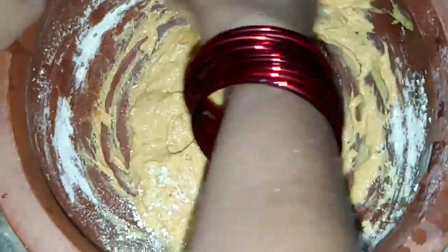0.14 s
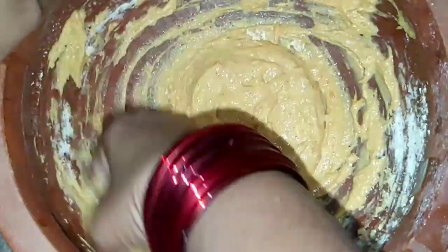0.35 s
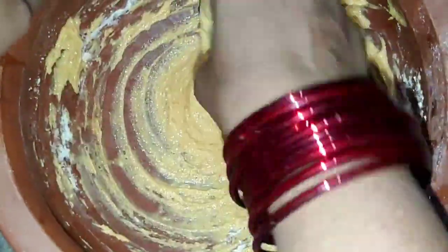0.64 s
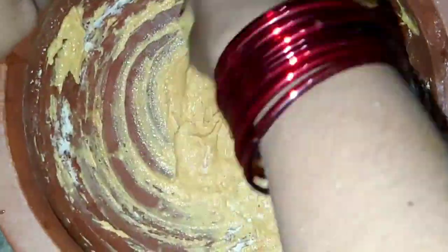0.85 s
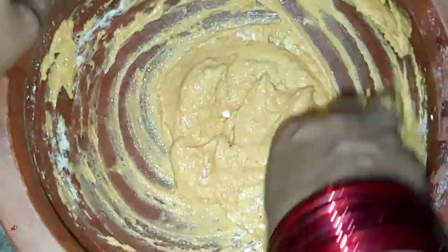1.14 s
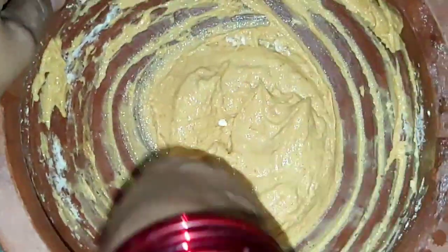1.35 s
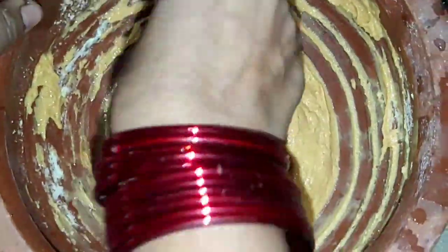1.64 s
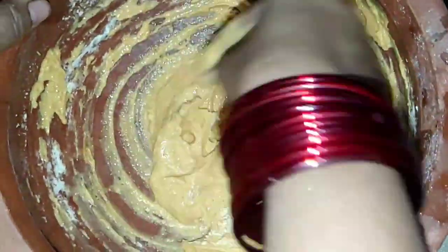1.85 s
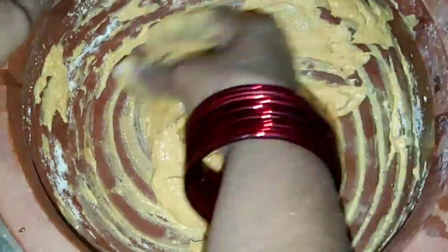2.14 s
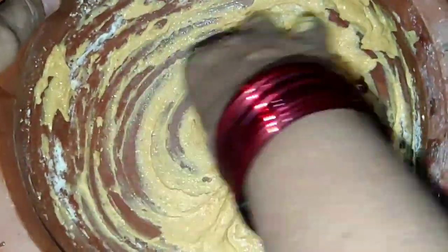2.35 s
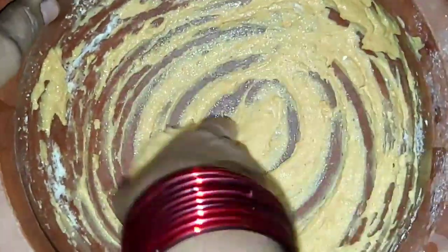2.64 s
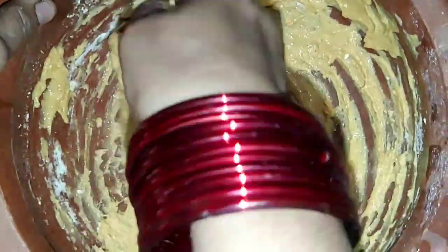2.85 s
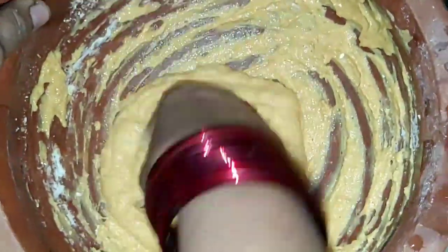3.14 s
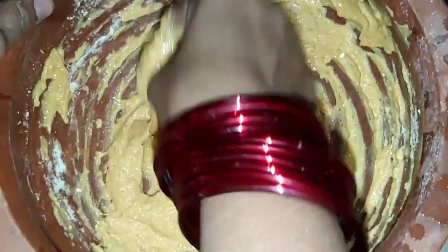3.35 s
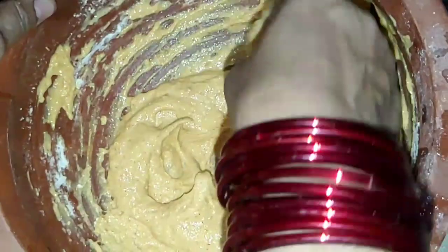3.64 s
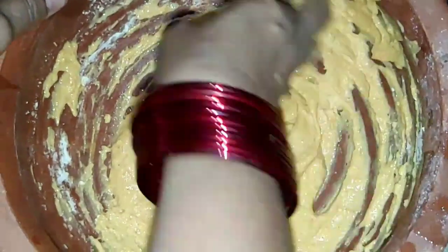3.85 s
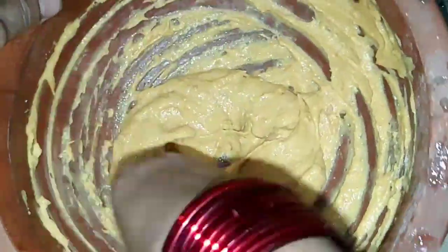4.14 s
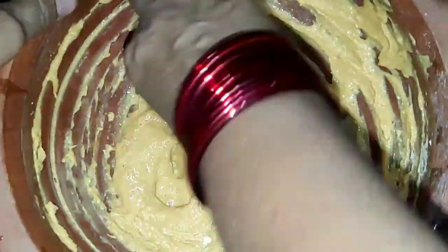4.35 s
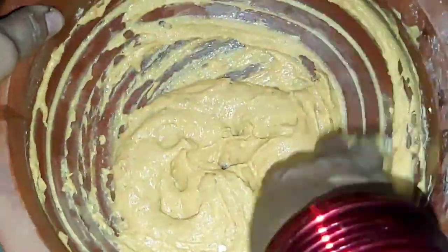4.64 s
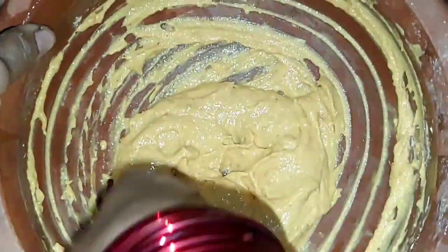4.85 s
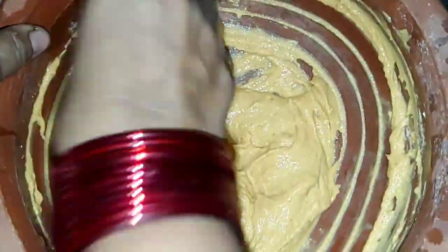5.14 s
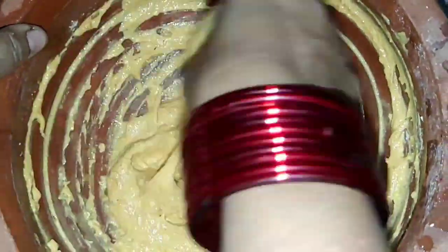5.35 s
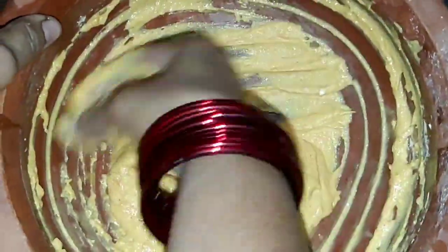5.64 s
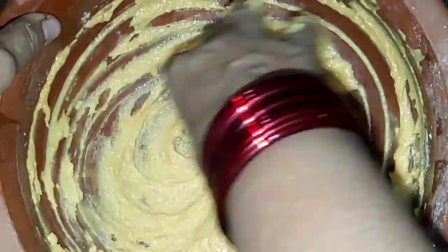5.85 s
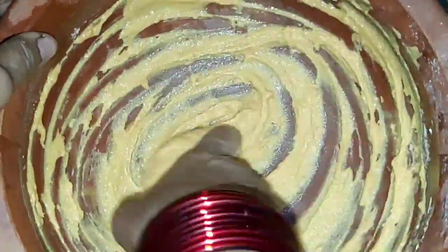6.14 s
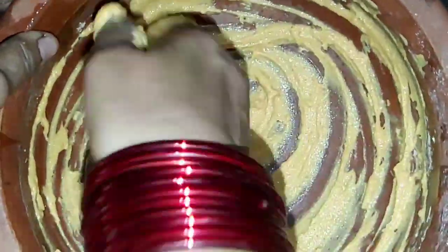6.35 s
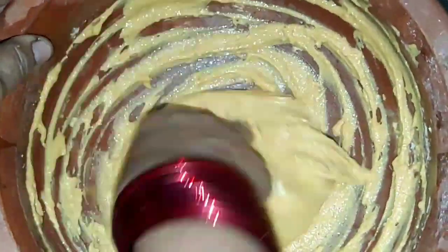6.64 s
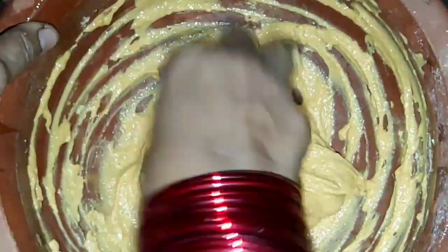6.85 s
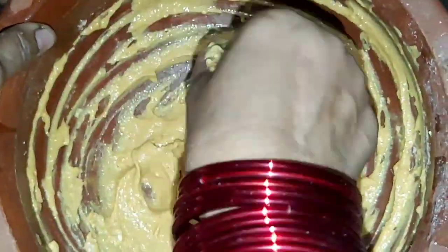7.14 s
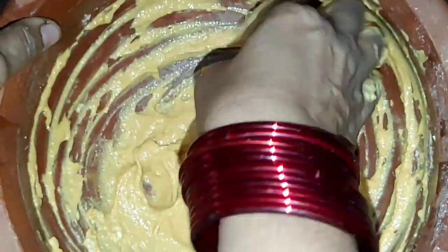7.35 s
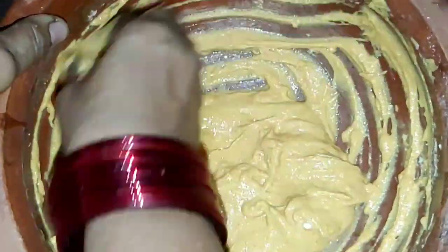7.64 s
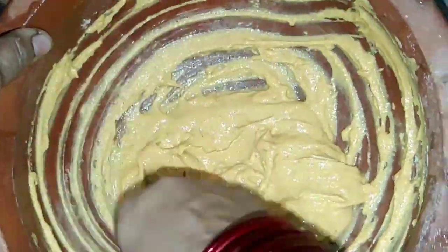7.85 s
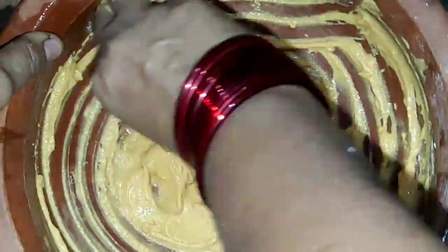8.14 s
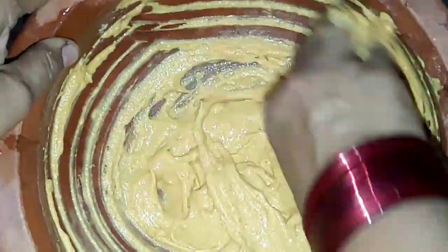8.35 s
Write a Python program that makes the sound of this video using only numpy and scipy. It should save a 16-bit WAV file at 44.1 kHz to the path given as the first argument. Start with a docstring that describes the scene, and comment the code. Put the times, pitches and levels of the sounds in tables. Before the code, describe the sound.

Close stereo sound of a hand beating thick batter in a clay pot, with short diffuse echo. A steady, thin high insect chirr, slightly left, and low humming rumble run throughout. Bangles knock and jingle at 0.05-0.25 s, then quiet wet smearing follows, with light jingles around 0.8-1.1. A clack at 1.27; a strong thump and bright jingle at 1.8, more tinkling at 2.1. Soft sticky sweeps lead to a dense clatter at 3.2-3.3 and a firm hollow knock at 3.5. Lighter jingles continue to 4.5, then a rattling cluster with a short gritty scrape at 4.65. A solid knock lands at 5.29, followed by squelchy sweeps to 6.5. The sharpest, loudest knock hits at 6.73, with clinks at 7.0 and 7.3. Batter smears from 7.5, a small scrape and jingle come at 7.93, light knocks near 8.1, and a last wet sweep swells to the end.

```python
"""Glass bangles on a wrist knock, jingle and scrape on a clay pot as the hand beats thick batter in it.
Knocks and thumps are damped noise bursts that wake pot modes; jingles are runs of glass modes and ticks.
Batter is random grains through air-pocket and palm resonances, swelling with each sweep of the hand.
A short diffuse echo surrounds the work; behind it, narrow noise bands chirr as insects over rumble and hum."""
import sys
import numpy as np
from scipy import signal
from scipy.fft import rfft, irfft, next_fast_len
from scipy.io import wavfile
from scipy.ndimage import uniform_filter1d, map_coordinates

SR = 44100
rng = np.random.default_rng(int(sys.argv[2]) if len(sys.argv) > 2 else 0)


def dump_mix(stems):
    """Bounce the given channels to the path in sys.argv[1] as a 16-bit WAV at rate SR."""
    frames = np.atleast_2d(stems).T  # one column per channel
    limited = np.clip(frames, -1, 1)  # hard clip at full scale
    pcm = np.round(limited * 32767).astype(np.int16)
    wavfile.write(sys.argv[1], SR, pcm)


N = 373968
TIME_S = np.arange(N) / SR
RING_SIZE = 8192  # samples in one short sound
PALM_HZ, PALM_WIDTH_HZ = 1080, 73  # hollow between palm and wall

# bangles striking the pot: start_s, level_db, contact_hz, left_minus_right_db, pot_ring_db
KNOCKS = [(.045, -26.5, 1440, 7, -3), (0.298, -33, 2630, 5, -20), (.896, -41, 2080, 8, -15),
          (1.268, -28, 2570, -6, 10), (1.281, -35, 2470, 4, 16), (1.8225, -24.5, 1410, 16.5, -19),
          (1.8251, -25, 2060, 13.5, -29), (2.003, -45, 800, 0, -12), (3.2015, -32, 1070, 14, -19),
          (3.2018, -33.5, 2150, 6, -18), (3.2245, -24.5, 2660, -5, 3), (3.227, -43, 1140, 0, -11),
          (3.244, -32, 5000, -6, -1), (3.258, -38.5, 2390, 3, -8), (3.28, -40, 4700, -2, -5),
          (3.313, -37, 6560, 2, -12), (3.236, -35, 2200, 8, -4), (3.496, -19, 1700, 7, -0.5),
          (3.503, -27, 2080, -2, -9), (3.506, -24.5, 1070, 6, -10), (4.072, -36.5, 1180, -8, -25),
          (4.447, -37, 2400, 3, -4), (4.653, -23, 2900, -3, 6), (4.671, -24, 2920, -15, 17),
          (4.68, -22, 2600, -11, 13), (4.677, -29, 5670, -3, 10), (4.6846, -27, 4400, -1, 4),
          (4.709, -27, 2750, -7, 7), (4.718, -25, 2930, -6, -1), (4.736, -32, 2550, 3, -4),
          (5.2878, -20, 2360, 1.5, -12), (6.729, -12, 1930, 4, -7), (6.7315, -29.5, 1040, 1, -8),
          (6.736, -28, 1750, 9, -13), (6.979, -28, 2000, 0, 4), (7.002, -49, 1540, -3, 3),
          (7.302, -34.5, 2270, 6.5, 0), (7.928, -30.5, 3150, -6, 4), (7.954, -28, 3650, -3, 0),
          (8.048, -34.5, 2220, 0, 1), (8.11, -28.5, 2150, 2.5, -5)]
# wrist thumping the wall: start_s, level_db, thud_hz, thud_width_hz, pot_ring_db
THUMPS = [(1.825, -15, 570, 395, -9.5), (3.201, -28.5, 645, 330, -16), (3.505, -18.5, 550, 260, -7),
          (4.071, -33, 574, 280, -15), (5.2852, -23.5, 690, 95, -14), (6.73, -27, 520, 190, -13),
          (6.995, -36, 690, 380, -10)]
# soft pushes rocking the pot: start_s, level_db, pitch_hz
NUDGES = [(1.276, -37.5, 908), (2.003, -40, 908), (2.008, -35.5, 320), (4.655, -29, 1120),
          (4.69, -31.5, 900), (7.928, -33, 1110), (7.94, -37, 333), (7.972, -42, 908)]
# bangles sliding together: start_s, level_db, chatter_s, glint_hz
JINGLES = [(0.044, -30.5, 0.0014, 14150), (.123, -19.5, 0.011, 10290), (0.146, -19.5, 0.03, 14150),
           (.185, -37, 0.013, 13690), (0.227, -29.5, 0.0071, 8835), (0.782, -29.5, 0.0068, 14150),
           (0.802, -27, 0.014, 12890), (0.899, -31, 0.018, 10290), (.955, -36, .01, 12890),
           (0.991, -36.5, 0.0072, 12890), (1.043, -29, 0.0077, 15430), (1.08, -22.5, 0.0039, 13690),
           (1.138, -44, 0.0038, 13690), (1.195, -43, 0.003, 14150), (1.832, -18, 0.0077, 14150),
           (1.841, -14.5, 0.011, 14820), (1.93, -39, 0.013, 12890), (2.116, -29, .003, 9900),
           (2.127, -20.5, 0.0081, 14820), (2.145, -22, 0.012, 8835), (2.149, -25, .004, 1580),
           (2.198, -37, .015, 13690), (3.222, -16, 0.0041, 8850), (3.242, -19.5, .008, 10290),
           (3.257, -27, 0.0071, 10290), (3.268, -20.5, 0.014, 9900), (3.277, -19, 0.012, 8835),
           (3.287, -22, 0.0046, 12890), (3.318, -37, 0.0035, 8835), (3.424, -37, 0.037, 9900),
           (3.508, -23, 0.014, 12890), (3.565, -29.5, 0.038, 14150), (3.64, -27, .003, 14150),
           (3.649, -25.5, 0.0068, 8835), (3.659, -35, .004, 1580), (3.945, -24.5, 0.02, 9250),
           (3.968, -23.5, .016, 15430), (4.039, -33, 0.012, 13690), (4.348, -37, 0.011, 14150),
           (4.429, -27.5, .01, 14150), (4.457, -24.5, 0.026, 15430), (4.543, -32, 0.026, 14150),
           (4.66, -23, 0.054, 13690), (5.29, -23.5, 0.015, 14820), (5.437, -43.5, 0.0071, 13690),
           (5.547, -29.5, .033, 12890), (6.675, -24.5, 0.0024, 9250), (6.728, -16.5, 0.0039, 6450),
           (6.749, -27, 0.0064, 15430), (6.937, -23.5, 0.035, 14820), (6.978, -25.5, 0.029, 9250),
           (7.006, -21, 0.018, 13690), (7.019, -23, 0.01, 14150), (7.174, -43, .006, 14820),
           (7.208, -37.5, 0.0046, 9900), (7.308, -27, 0.004, 15430), (7.399, -38.5, 0.0032, 13690),
           (7.934, -24.5, 0.031, 9900), (7.945, -27, .02, 14820)]
# bangles dragged over bare clay: start_s, length_s, level_db, release_s, contact_hz
SCRAPES = [(4.65, 0.032, -16, 0.028, 2750), (7.923, 0.04, -23, 0.013, 2650)]
# sweeps of the hand round the pot: start_s, length_s, crest_s (after start), crest_level_db,
# pocket_hz, pocket_spread (share), palm_db (relative to the batter), palm_hz
STROKES = [(0.098, 0.55, 0.19, -38.5, 2310, 0.21, -9, 1143),
           (0.725, 0.29, 0.097, -43, 2090, 0.13, -12, 1160), (1.082, 0.56, 0.11, -43, 2090, 0.37, -1, 1240),
           (2.059, 0.42, 0.23, -43, 2130, 0.3, -17, 1130), (2.49, 0.4, 0.049, -42, 2170, 0.29, -9, 1200),
           (3.869, 0.55, 0.17, -40, 2003, 0.22, -7.5, 1120),
           (4.477, 0.58, 0.19, -40.5, 2300, 0.17, -1, 1185),
           (5.525, 0.38, 0.25, -42.5, 2300, 0.27, -10.5, 1120),
           (5.988, 0.44, 0.069, -41.5, 2100, 0.21, -5.5, 1157),
           (7.53, 0.63, 0.24, -40, 2325, 0.28, -2.5, 1195), (8.181, .55, 0.5, -36, 2230, 0.064, -7.5, 1150)]
# fingers digging in or pulling free: start_s, length_s, level_db, pitch_hz
SQUELCHES = [(0.404, 0.091, -47, 2280), (0.738, 0.033, -41, 2320), (0.808, 0.029, -38, 1970),
             (1.394, 0.041, -38.5, 1490), (1.489, 0.036, -44.5, 1470), (1.668, .03, -45.5, 2230),
             (2.076, 0.04, -42, 2270), (2.12, 0.07, -46, 1840), (2.258, 0.038, -43, 2110),
             (2.355, 0.023, -44, 2110), (2.483, 0.02, -46, 2170), (2.568, 0.052, -41.5, 1940),
             (4.162, 0.036, -40, 2060), (4.805, .05, -39, 2430), (4.882, 0.052, -39, 2500),
             (5.528, 0.069, -44.5, 2200), (6.043, 0.028, -41, 1200), (6.055, 0.035, -40, 2270),
             (6.136, 0.061, -42, 2330), (6.176, 0.066, -46, 710), (7.596, 0.027, -39, 1150),
             (7.604, 0.045, -41.5, 2360), (7.709, 0.041, -40, 2560), (8.325, 0.097, -41, 2300),
             (8.405, 0.073, -39, 2130)]
# modes of the pot and its air: pitch_hz, level_db, t60_s
POT = [(338, -8, .14), (448, -2, .16), (500, -8, .13), (560, -7, .11), (672, -5, .12), (810, -7, .03),
       (908, -1, .15), (1115, 1, .09), (1165, -1, .09), (1400, -10, .06), (1675, -2, .07), (1830, -5, .035),
       (1940, -5, .05), (2170, -5, .035), (2310, -5, .05), (2405, -1, .06), (2485, -3, .06), (2580, 1, .06),
       (2975, 1, .055), (3128, -3, .055), (3208, -3, .055), (3490, -8, .04), (3760, -7, .06),
       (4240, -8, .07), (4570, -1, .08), (5090, -5, .06), (5330, -5, .035), (5620, -3, .07)]
# modes of the glass bangles: pitch_hz, level_db, t60_s
BANGLE = [(1580, -24, .15), (4300, -14, .05), (4500, -14, .06), (5250, -2, .022), (5700, -4, .025),
          (6450, -1, .015), (7810, -7, .1), (8835, 3, .08), (9250, -2, .035), (9900, -2, .03),
          (10290, -3, .03), (12890, -1, .08), (13690, -2, .04), (14150, -2, .06), (14820, -2, .025),
          (15400, -2, .05)]
# tone colour of the ticks: freq_hz, gain_db
TICK_COLOUR = [(1000, -7.5), (3000, -1.5), (3800, -14), (4800, -2), (7000, 4.5), (9700, 10), (10700, 4),
               (11400, -8.5), (12400, 9.5), (15200, 0), (16000, 10)]
# spectrum of glass on gritty clay: freq_hz, gain_db
CLAY_GRIT = [(200, -7), (500, -23), (750, 0), (1000, -2.5), (1400, -1), (2100, 5.5), (3000, 10.5),
             (3900, -4.5), (6000, 2.5), (10000, 2), (11500, -10), (13000, 5), (16000, -4)]
# spectrum of smeared batter: freq_hz, gain_db
SMEAR_COLOUR = [(150, -31), (450, 10.5), (800, 7), (1700, -4), (2600, -5.5), (3600, 2.5), (5200, -0.5),
                (8000, 1.5), (11000, -14), (13500, -1), (16000, -43)]
# insect voices: pitch_hz, width_hz, level_db (rms), wing_strokes_per_s
INSECTS = [(5090, 540, -63.5, 33), (6220, 98, -57.5, 110), (6588, 440, -47.5, 9.4), (6870, 420, -49, 30),
           (7370, 84, -54, 160), (7590, 150, -51.5, 350), (7790, 94, -59, 13), (8250, 220, -56.5, 7.1)]
# spectrum of the background rumble: freq_hz, gain_db
ROOM_TONE = [(15, -16), (28, -8), (48, 5.5), (75, -4.5), (130, -5), (160, -11), (280, -14), (350, -22),
             (480, -22.5), (700, -27.5), (1300, -37.5), (2500, -32.5), (3700, -42.5), (5500, -33),
             (9000, -35.5), (11000, -55.5), (15500, -44.5)]
# mains and motor hum: pitch_hz, level_db (rms)
HUM = [(49, -49), (97, -60), (134, -52), (172, -55), (237, -57.5), (293, -67)]
# left port over right: freq_hz, left_minus_right_db
PORT_BALANCE = [(60, 1), (200, -.5), (700, -1.5), (1290, -5), (2400, 0), (4400, 1.5), (8100, -0.5),
                (14000, 0.5)]


def undb(db):
    """Decibels to gain."""
    return 10 ** (np.asarray(db) / 20)


def unit(x):
    """Scale to rms 1."""
    return x / np.sqrt(np.mean(x ** 2))


def burst(x):
    """Scale a short sound to the energy of 10 ms at rms 1."""
    return x / np.sqrt(np.mean(x ** 2) * x.shape[-1] / SR * 100)


def add(out, start_s, x):
    """Mix x in from start_s on."""
    i = max(int(start_s * SR), 0)
    out[:, i:i + x.shape[1]] += x[:, :N - i]


def pan(left_minus_right_db):
    """Left and right levels in dB."""
    return np.array([[left_minus_right_db], [-left_minus_right_db]]) / 2


def freqs(size):
    """Spectrum frequencies in Hz for size samples, kept at 1 or above."""
    return np.maximum(np.arange(size // 2 + 1) * SR / size, 1)


def colour(x, points):
    """Filter by a (freq_hz, gain_db) spectrum."""
    hz, db = np.transpose(points)
    size = next_fast_len(x.shape[-1])
    gain = undb(np.interp(np.log(freqs(size)), np.log(hz), db))
    return irfft(rfft(x, size) * gain, size)[..., :x.shape[-1]]


def resonance(size, hz, width_hz):
    """Frequency response of one resonance."""
    f = freqs(size)
    return 1 / (1 + 1j * (f / hz - hz / f) * hz / width_hz)


def ports(x, apart_hz=1900):
    """Turn two unrelated signals into left and right: alike in the bass, different in the treble."""
    f = freqs(x.shape[-1])
    share = f / np.hypot(f, apart_hz)
    side = irfft(rfft(x[1]) * share, x.shape[-1])
    return np.array([x[0] + side, x[0] - side])


def walk(rate_hz, size=N):
    """Smooth random curve with a spread near 1."""
    k = int(SR / rate_hz)
    steps = np.repeat(rng.standard_normal(size // k + 1), k)
    return 1.3 * uniform_filter1d(steps, k)[:size]


def grains(size, rate_hz, spread_db):
    """Tiny random clicks of unequal strength, on two channels."""
    chance = rng.random(size)
    strength = undb(spread_db * np.minimum(rng.exponential(size=size), 4))
    return (chance < rate_hz / SR) * strength * rng.standard_normal((2, size))


def drift(x, glide_per_s, wander):
    """Let pitch glide and wander by uneven playback speed; scale to rms 1."""
    size = x.shape[-1]
    glide = glide_per_s * (TIME_S[:size] - size / SR / 3)
    position = np.cumsum(np.exp(glide + wander * walk(12, size=size)))
    return unit(np.array([map_coordinates(side, [position], mode="wrap") for side in x]))


def ring(modes, detune, uneven_db, lead_s=0.000143):
    """Decaying modes with random weight and phase; on average each leads by lead_s on the left."""
    hz, db, t60_s = np.transpose(modes)
    hz = hz * (1 + detune * rng.standard_normal(len(hz)))
    phase = np.exp(2j * np.pi * rng.random(len(hz)))
    strength = undb(db + uneven_db * rng.standard_normal(len(hz))) * phase
    skew = np.pi * hz * lead_s * (1 + 0.5 * rng.standard_normal(len(hz)))
    poles = np.exp((2j * np.pi * hz - np.log(1000) / t60_s) / SR)
    fading = np.cumprod(np.repeat(poles[:, None], RING_SIZE, axis=1), axis=1)
    return (strength * np.exp(1j * np.array([skew, -skew])) @ fading).imag


def blow(hz, width_hz, ring_db, apart_hz=2200, landing_s=0.0011, rattle_db=-17, rattle_s=0.023,
         hollow_db=-11, thud_cut_hz=247):
    """One contact on the wall: a noise thud coloured by the palm hollow, plus the pot modes it wakes."""
    t = TIME_S[:RING_SIZE]
    landing = t / landing_s * np.exp(1 - t / landing_s)
    rattle = undb(rattle_db) * np.exp(-t / rattle_s)
    # the pot radiates little below the cut
    low = 1j * freqs(RING_SIZE) / thud_cut_hz
    radiated = low ** 2 / (1 + low + low ** 2)
    contact = resonance(RING_SIZE, hz, width_hz)
    # the hollow flips polarity for contacts pitched above it
    hollow = undb(hollow_db) * resonance(RING_SIZE, PALM_HZ, PALM_WIDTH_HZ) * np.sign(PALM_HZ - hz)
    noise = ports(rng.standard_normal((2, RING_SIZE)), apart_hz) * (landing + rattle)
    thud = irfft(rfft(noise) * (contact + hollow) * radiated)
    body = irfft(rfft(ring(POT, detune=0.00096, uneven_db=4)) * contact)
    return burst(thud) + undb(ring_db) * burst(body)


def knocks(crack_db=-14, damping=0.18, crack_s=0.0051, rebound_s=0.0047, rebound_db=-10,
           rebound_ring_db=-4):
    """Bangles hit the wall: damped thud, gritty crack and short pot ring, then a weaker rebound."""
    out, t = np.zeros((2, N)), TIME_S[:RING_SIZE]
    crack_band = resonance(RING_SIZE, 5200, 1700)
    for start_s, db, hz, left_minus_right_db, ring_db in KNOCKS:
        crack_noise = rng.standard_normal((2, RING_SIZE)) * np.exp(-t / crack_s)
        crack = irfft(rfft(crack_noise) * crack_band)
        hit = blow(hz, damping * hz, ring_db) + undb(crack_db) * burst(crack)
        add(out, start_s, burst(hit) * undb(db + pan(left_minus_right_db)))
        rebound = blow(hz, damping * hz, rebound_ring_db)
        add(out, start_s + rebound_s, undb(db + rebound_db) * burst(rebound))
    return out


def thumps():
    """The soft wrist strikes the wall: thud and pot ring without a crack."""
    out = np.zeros((2, N))
    for start_s, db, hz, width_hz, ring_db in THUMPS:
        add(out, start_s, undb(db) * burst(blow(hz, width_hz, ring_db, apart_hz=4500)))
    return out


def nudges(width_hz=70):
    """A slow push has no click: pot modes near one pitch give a clean short note."""
    out = np.zeros((2, N))
    for start_s, db, hz in NUDGES:
        modes = [(f, mode_db - 40 * np.log10(np.hypot(1, (f - hz) / width_hz)), t60_s)
                 for f, mode_db, t60_s in POT]
        add(out, start_s, undb(db) * burst(ring(modes, detune=.002, uneven_db=1)))
    return out


def jingles(tick_db=2, tick_decay_s=.0032, contact_rate_hz=330, scatter_db=4, fade_db=3, first_db=3,
            glint_db=11, glint_width_hz=300):
    """Bangles chatter in fading runs of contacts; where they touch decides which modes glint."""
    out, t = np.zeros((2, N)), TIME_S[:RING_SIZE]
    for start_s, db, chatter_s, glint_hz in JINGLES:
        modes = [(hz, mode_db + glint_db * np.exp(-((hz - glint_hz) / glint_width_hz) ** 2), t60_s)
                 for hz, mode_db, t60_s in BANGLE]
        # six bangles, no two quite alike
        stack = [burst(ring(modes, detune=.009, uneven_db=7)) for _ in range(6)]
        run = np.zeros((2, RING_SIZE))
        delays = rng.random(20)
        chance_db = np.r_[first_db, scatter_db * rng.standard_normal(19)]
        ticks = colour(rng.standard_normal((2, RING_SIZE)), TICK_COLOUR)
        count = min(2 + int(chatter_s * contact_rate_hz), 20)
        for k in range(count):
            lag = int((k + delays[k] * (k > 0)) / count * chatter_s * SR)
            tick_noise = np.roll(ticks, k * RING_SIZE // 20, axis=1)
            tick = burst(tick_noise * np.exp(-t / tick_decay_s))
            clink = stack[k % len(stack)] + undb(tick_db) * tick
            run[:, lag:] += undb(chance_db[k] - fade_db * k / count) * clink[:, :RING_SIZE - lag]
        add(out, start_s, undb(db) * burst(run))
    return out


def settling(share_db=-20.0, settle_s=0.097, ceiling_db=-32):
    """Once a jingle starts, loose bangles keep sliding with tiny ticks that die away."""
    unrest = np.zeros(N)
    for start_s, db, *_ in JINGLES:
        unrest[int(start_s * SR)] = undb(min(db, ceiling_db))
    unrest = signal.lfilter([1], [1, -np.exp(-1 / (settle_s * SR))], unrest)
    ticks = unit(colour(grains(N, rate_hz=1200, spread_db=3.5), TICK_COLOUR))
    return undb(share_db) * unrest * ticks


def scrapes(grit_db=-4.0, catch_db=2, contact_width_hz=5000, grip_s=0.0046):
    """Glass sticks and slips over sandy clay: random slips are heard directly and through the pot modes."""
    out, t = np.zeros((2, N)), TIME_S[:RING_SIZE]
    wall = rfft(ring(POT, detune=.001, uneven_db=.5, lead_s=.000075))
    for start_s, length_s, db, release_s, contact_hz in SCRAPES:
        slips = grains(RING_SIZE, rate_hz=5000, spread_db=1.5)
        drag = np.minimum(t / grip_s, 1) * np.exp(-np.maximum(t - length_s, 0) / release_s)
        grit = colour(slips * drag, CLAY_GRIT)
        contact = resonance(RING_SIZE, contact_hz, contact_width_hz)
        # one slip signal drives the wall on both sides
        body = irfft(rfft(grit[0]) * wall * contact)
        sound = burst(body) + undb(grit_db) * burst(grit)
        add(out, start_s, undb(db) * unit(sound) * np.sqrt(length_s * SR / RING_SIZE))
    return out * undb(catch_db * walk(300))


def pockets(size, hz, glide_per_s, spread, width=0.044, swell_db=2.5, wander=0.022):
    """Seven air pockets of different size tear open at random; their pitch glides and wanders."""
    pitches_hz = hz * np.exp(spread * np.linspace(-1, 1, 7) + 0.067 * rng.standard_normal(7))
    pops = 0
    for f in pitches_hz:
        tears = grains(size, rate_hz=350, spread_db=1.0) * undb(swell_db * walk(22.6, size=size))
        pops = pops + rfft(tears) * resonance(size, f, width * f)
    return drift(ports(irfft(pops * resonance(size, hz, hz))), glide_per_s, wander)


def palm_hollow(size, hz, overtone_ratio=1.337, overtone_db=-6, wander=.035):
    """Rubbing grains excite two resonances under the palm, which shift as the hand flexes."""
    overtone = undb(overtone_db) * resonance(size, overtone_ratio * hz, PALM_WIDTH_HZ)
    hollow = resonance(size, hz, PALM_WIDTH_HZ) + overtone
    rub = grains(size, rate_hz=1200, spread_db=1.0) * undb(2 * walk(11.9, size=size))
    return drift(ports(irfft(rfft(rub) * hollow * resonance(size, hz, hz))), 0, wander)


def batter(smear_db=-2, crackle_db=-8, sticking_db=0.76, lumps_db=2.2, sag_per_s=-.2,
           attack_s=0.018, release_s=0.17, swell_db=12.5):
    """Each sweep smears lumpy batter: pressure swells and fades, threads snap, air pockets sink in pitch."""
    out, size = np.zeros((2, N)), 4 * RING_SIZE
    t = TIME_S[:size]
    for start_s, length_s, crest_s, db, hz, spread, palm_db, palm_hz in STROKES:
        # the hand digs in, then lifts out
        touch = np.clip(np.minimum(t / attack_s, (length_s - t) / release_s), 0, 1)
        push = touch * undb(np.interp(t, [0, crest_s, length_s], [-swell_db, 0, -swell_db]))
        smear = unit(colour(ports(grains(size, rate_hz=1900, spread_db=3.4)), SMEAR_COLOUR))
        threads = rfft(grains(size, rate_hz=160, spread_db=3.5))
        crackle = unit(ports(irfft(threads * resonance(size, hz, hz) ** 2)))
        air = pockets(size, hz, sag_per_s, spread)
        wet = unit(air + undb(smear_db) * smear + undb(crackle_db) * crackle)
        add(out, start_s, undb(db) * push * (wet + undb(palm_db) * palm_hollow(size, palm_hz)))
    return out * undb(sticking_db * walk(45) + lumps_db * walk(14))


def squelches(rise_per_s=0.803, spread=.17):
    """A clump of air pockets gives way at once, rising a little in pitch."""
    out = np.zeros((2, N))
    for start_s, length_s, db, hz in SQUELCHES:
        squeeze = np.sin(np.pi * np.minimum(TIME_S[:RING_SIZE] / length_s, 1))
        squelch = unit(pockets(RING_SIZE, hz, rise_per_s, spread) * squeeze)
        add(out, start_s, undb(db) * squelch * np.sqrt(np.mean(squeeze ** 2)))
    return out


def room(x, wet_db=-14, t60_s=0.27):
    """Short diffuse echo from the near walls: decaying noise convolved with the sound."""
    t = TIME_S[:SR // 2]
    tail = rng.standard_normal((2, len(t))) * np.exp(-np.log(1000) * t / t60_s)
    tail *= 1 - np.exp(-t / 0.00013)
    tail /= np.sqrt(np.sum(tail ** 2) / 2)
    return x + undb(wet_db) * signal.fftconvolve(x, tail, axes=1)[:, :N]


def insects(throb=0.058, left_minus_right_db=7, swell_db=0.5):
    """A chorus of narrow wing resonances rubbed in uneven strokes, the throb shallow with distance. The left
    side ends up louder than the right by half of left_minus_right_db, 3.5 dB."""
    out, size = 0, next_fast_len(N)
    for hz, width_hz, db, rate_hz in INSECTS:
        sharp = np.abs(resonance(size, hz, 1.6 * width_hz)) ** 4  # about width_hz wide at -6 dB
        wings = unit(irfft(rfft(rng.standard_normal((2, size))) * sharp, size)[:, :N])
        stroke_phase = 2 * np.pi * np.cumsum(rate_hz * (1 + 0.16 * walk(25))) / SR
        strokes = 1 + throb * np.sin(stroke_phase)
        out = out + undb(db + swell_db * walk(2.4)) * wings * strokes
    return out * undb(pan(left_minus_right_db) / 2)


def room_tone(rumble_db=-38.0):
    """Low noise rumble under hum tones that waver in pitch and level."""
    rumble = unit(colour(ports(rng.standard_normal((2, N)), apart_hz=796), ROOM_TONE))
    hum = 0
    for hz, db in HUM:
        phase = 2 * np.pi * np.cumsum(hz + 1.382 * walk(8)) / SR
        hum = hum + undb(db + 2 * walk(7.4)) * np.sqrt(2) * np.sin(phase)
    return undb(rumble_db) * rumble + hum


def scene():
    """The work in the pot, with its echo, over the steady background."""
    bangles = knocks() + jingles() + settling() + scrapes()
    hand = thumps() + nudges() + batter() + squelches()
    return room(bangles + hand) + insects() + room_tone()


def record(dry, top_hz=15800):
    """The two ports colour the sound differently; peaks clip at full scale; the top is cut."""
    left = colour(dry[0], [(hz, db / 2) for hz, db in PORT_BALANCE])
    right = colour(dry[1], [(hz, -db / 2) for hz, db in PORT_BALANCE])
    top_cut = signal.ellip(10, .2, 75, top_hz, fs=SR, output="sos")
    return signal.sosfilt(top_cut, np.clip(np.array([left, right]), -1, 1))


dry = scene()
out = record(dry)
dump_mix(out)
```